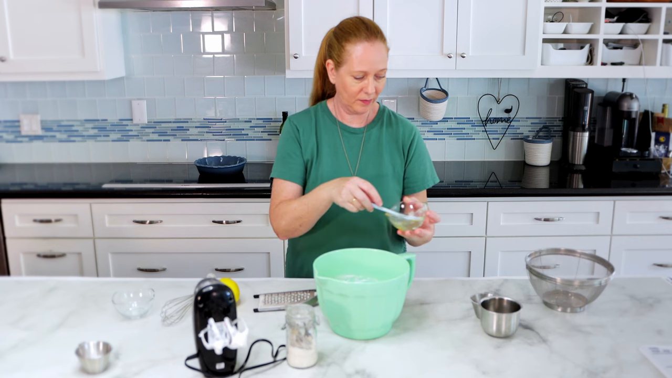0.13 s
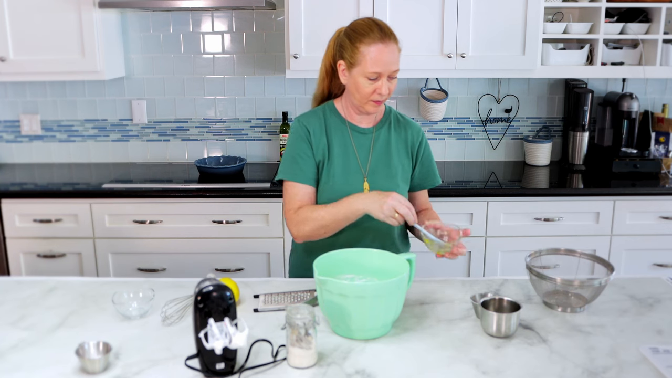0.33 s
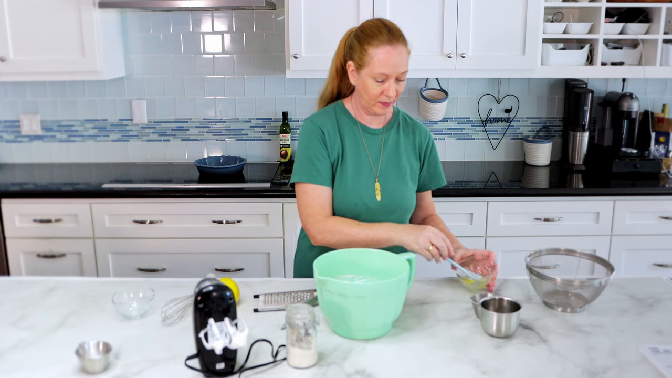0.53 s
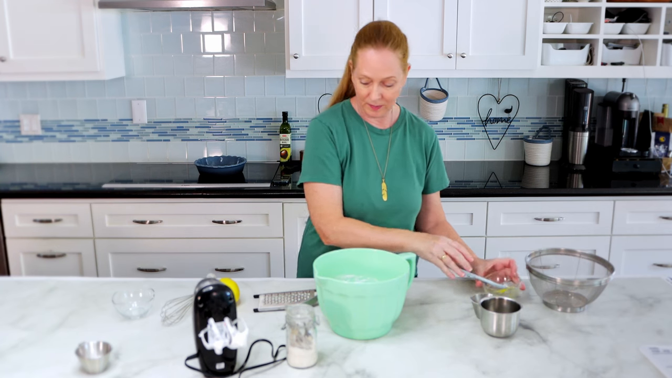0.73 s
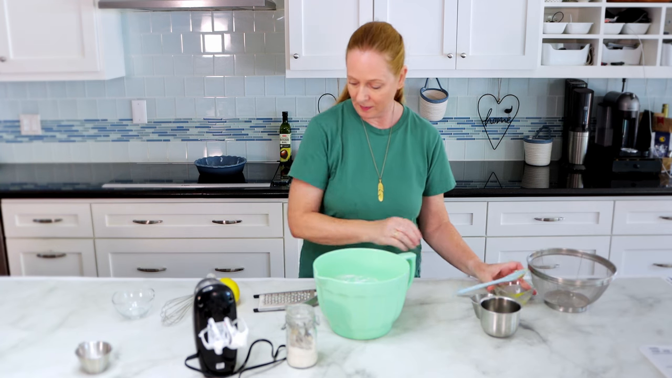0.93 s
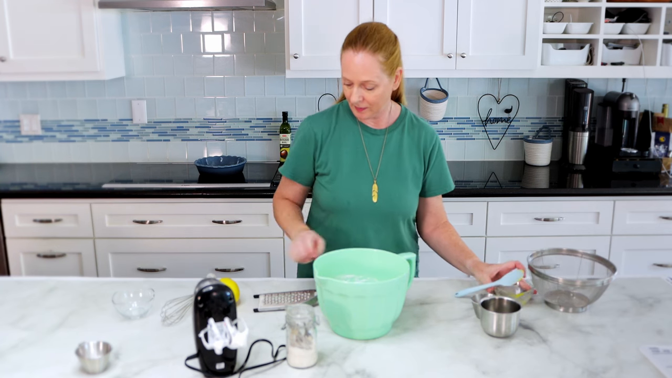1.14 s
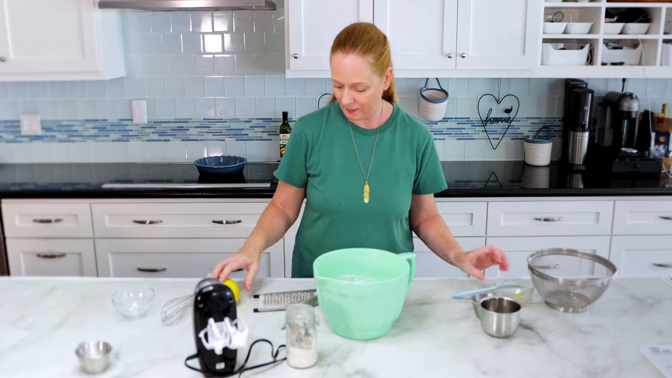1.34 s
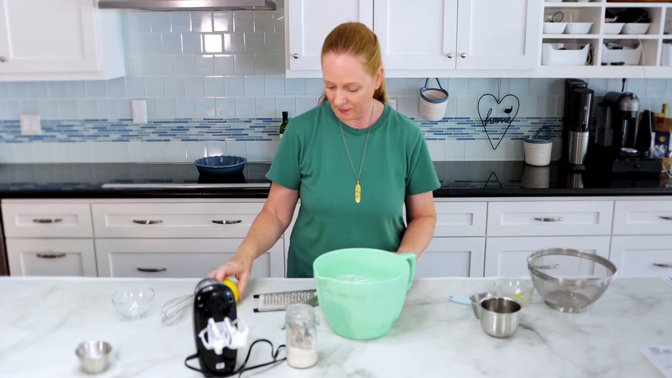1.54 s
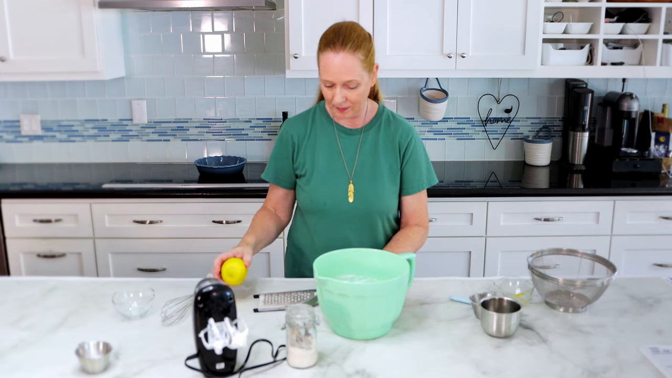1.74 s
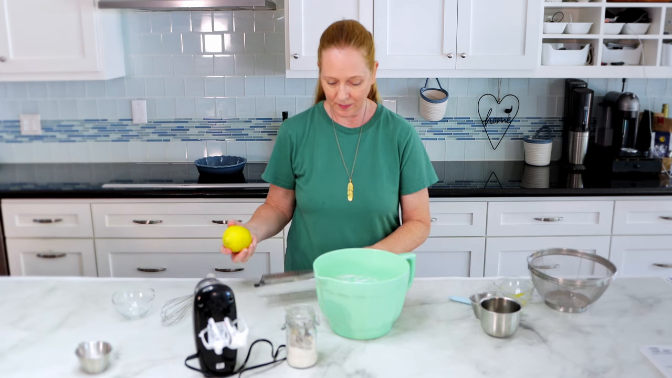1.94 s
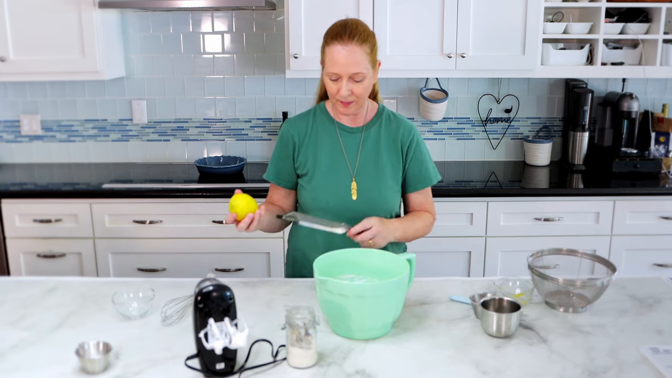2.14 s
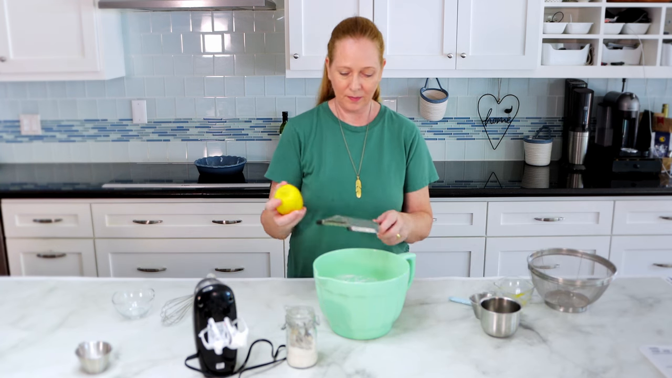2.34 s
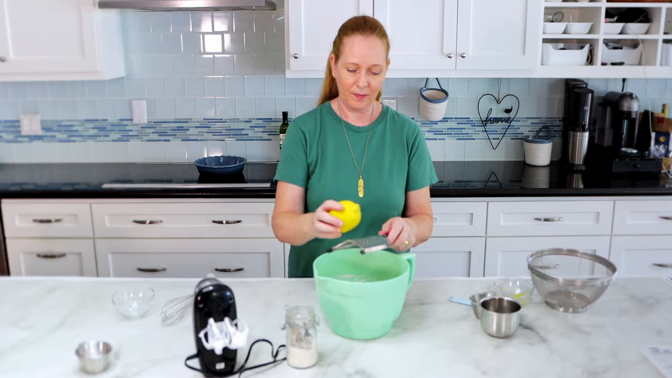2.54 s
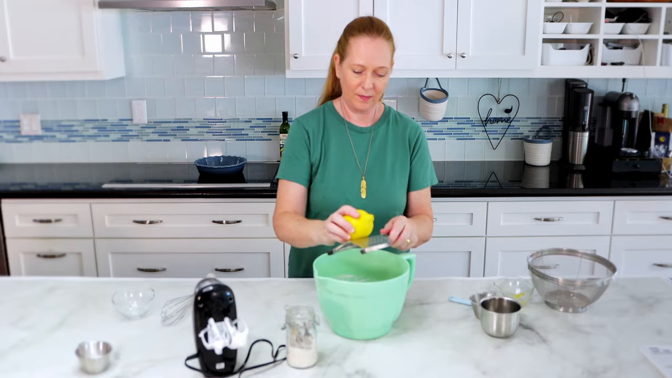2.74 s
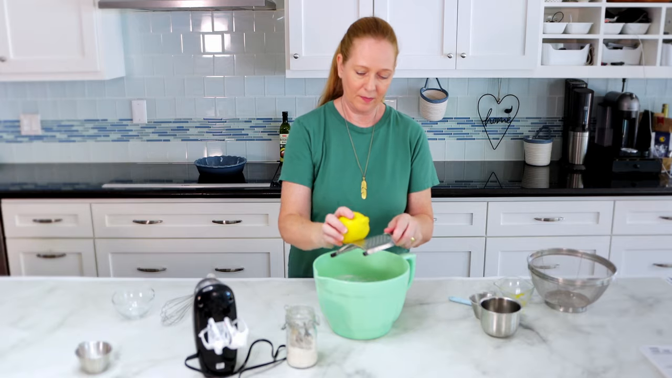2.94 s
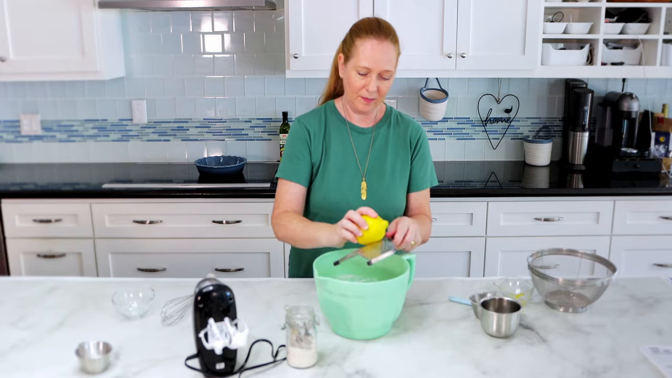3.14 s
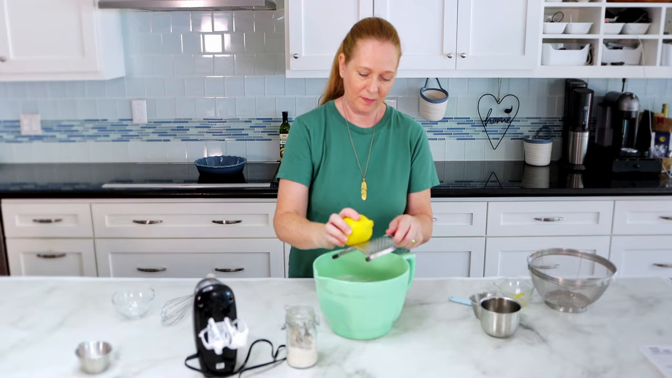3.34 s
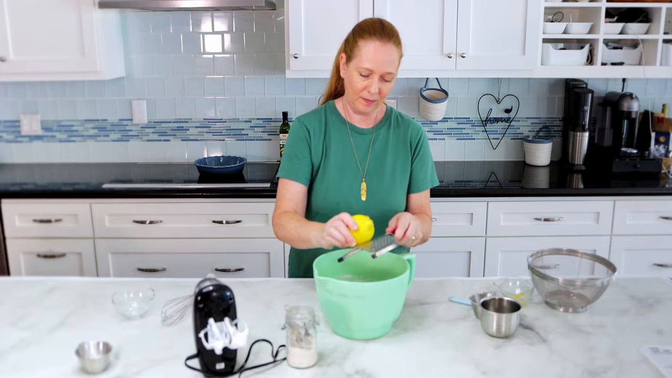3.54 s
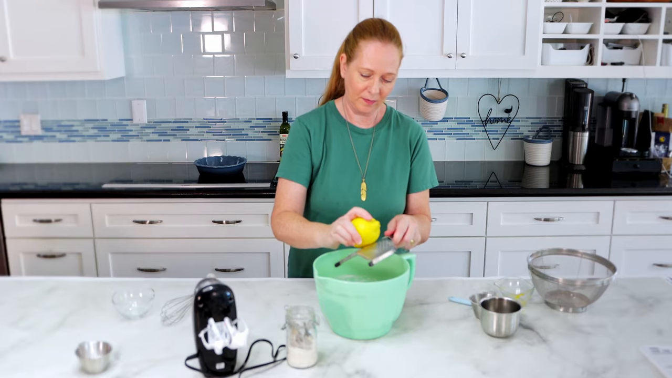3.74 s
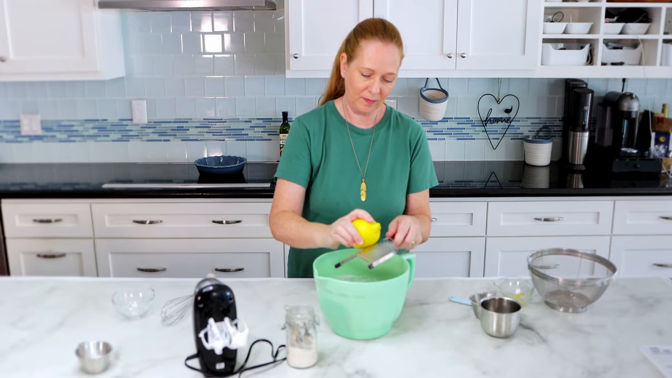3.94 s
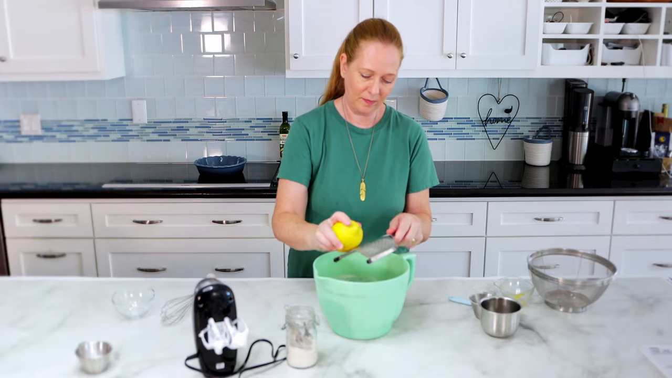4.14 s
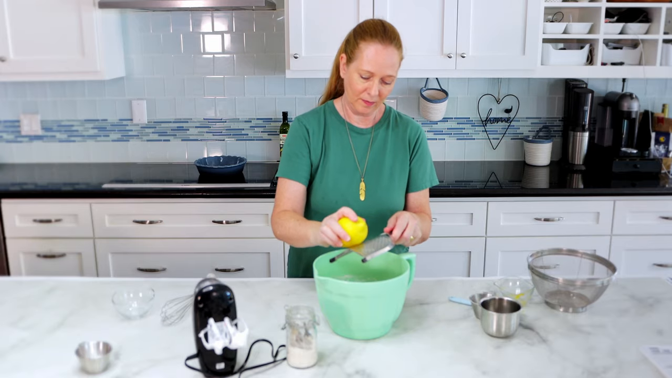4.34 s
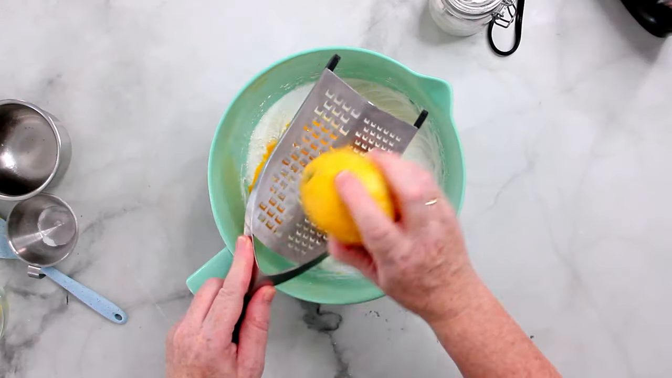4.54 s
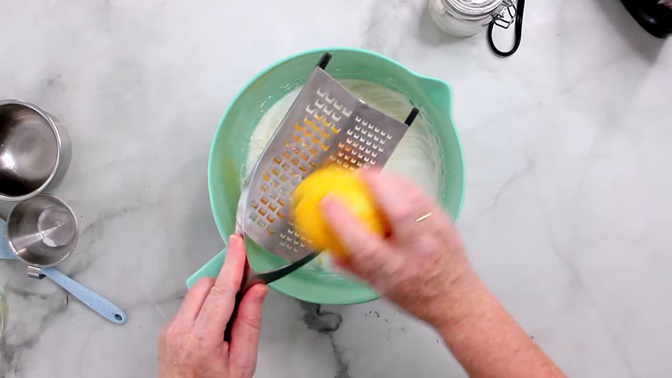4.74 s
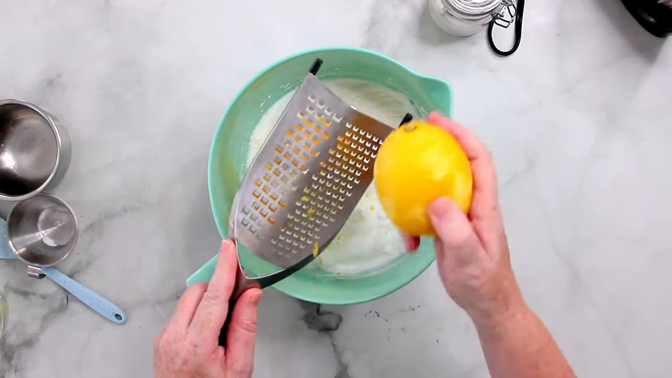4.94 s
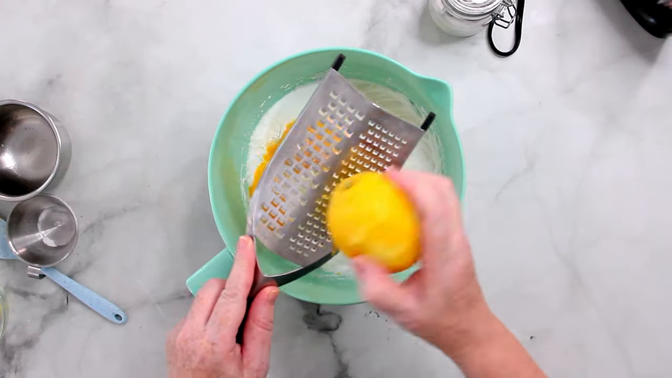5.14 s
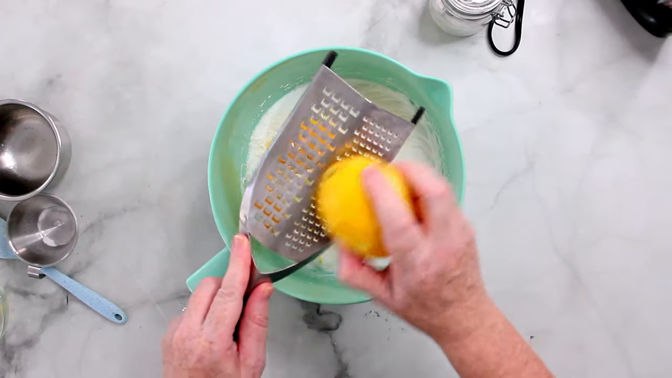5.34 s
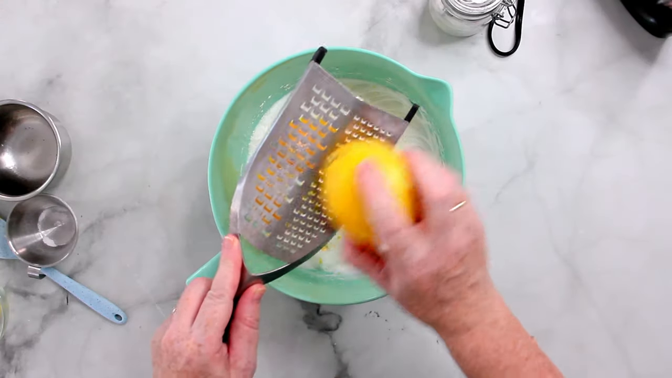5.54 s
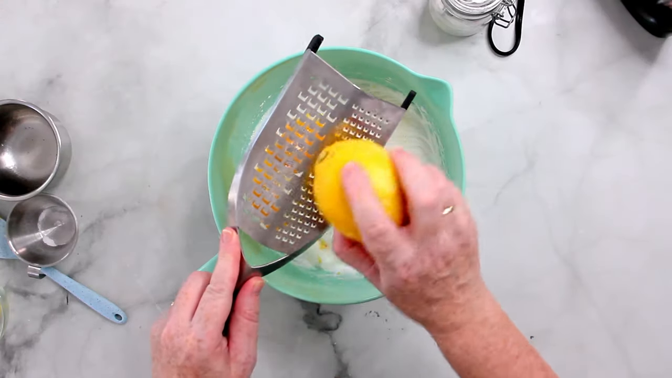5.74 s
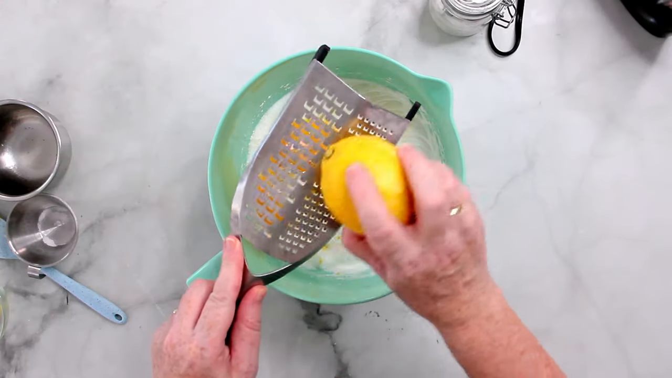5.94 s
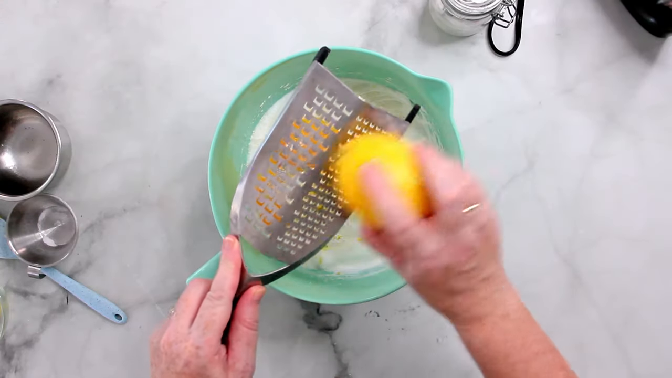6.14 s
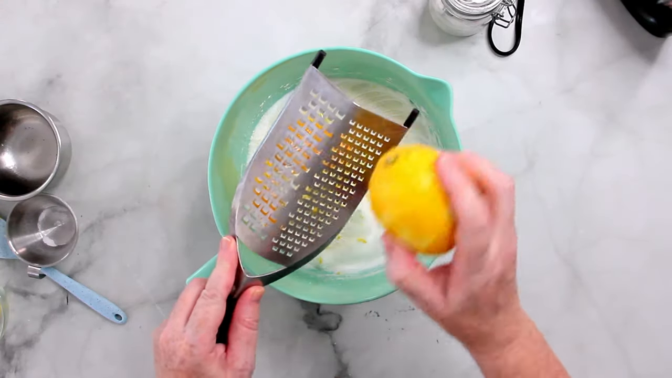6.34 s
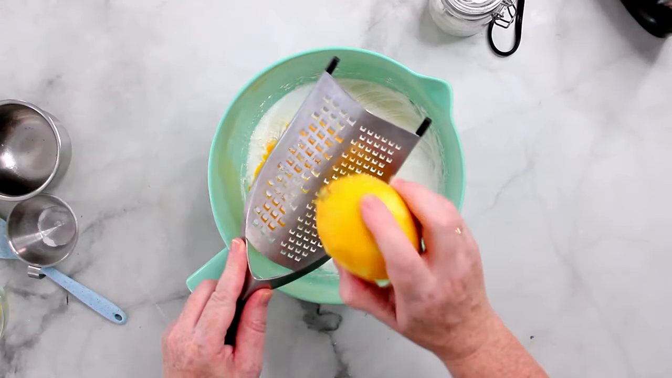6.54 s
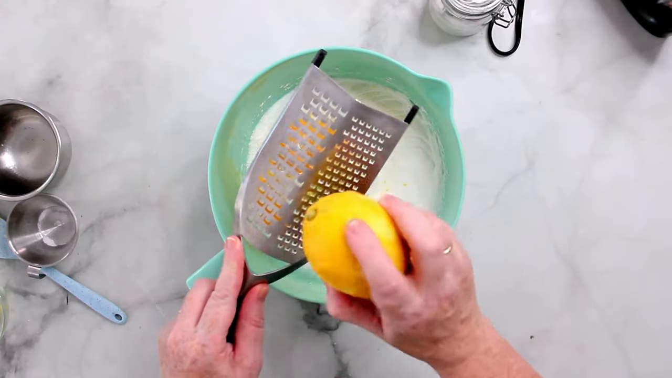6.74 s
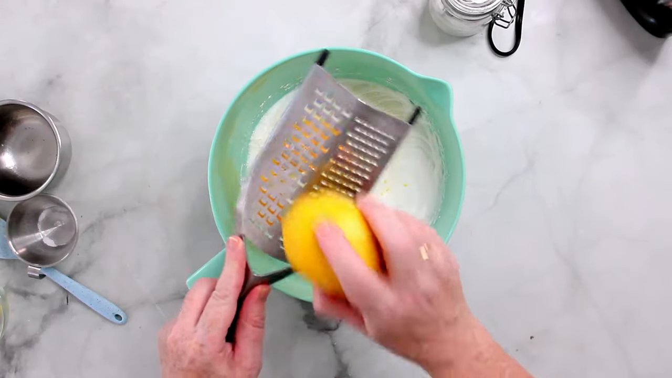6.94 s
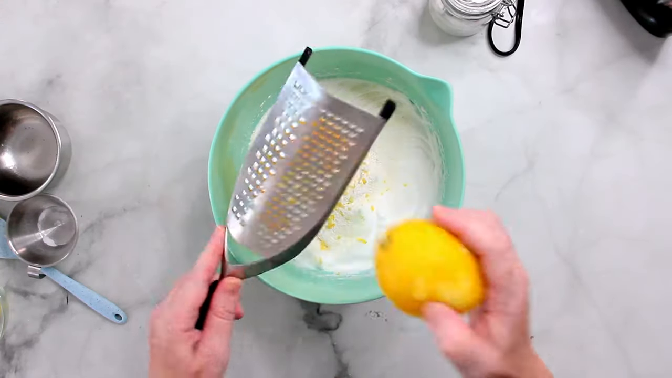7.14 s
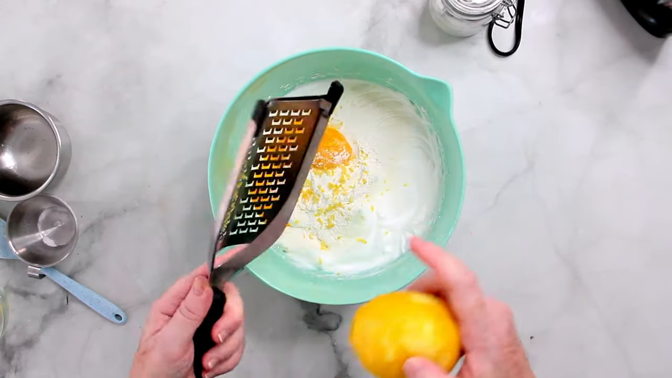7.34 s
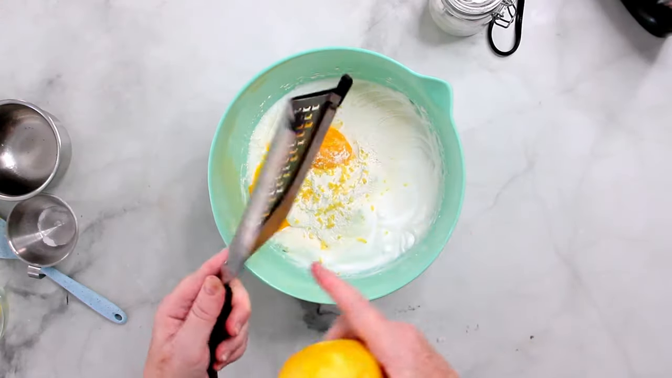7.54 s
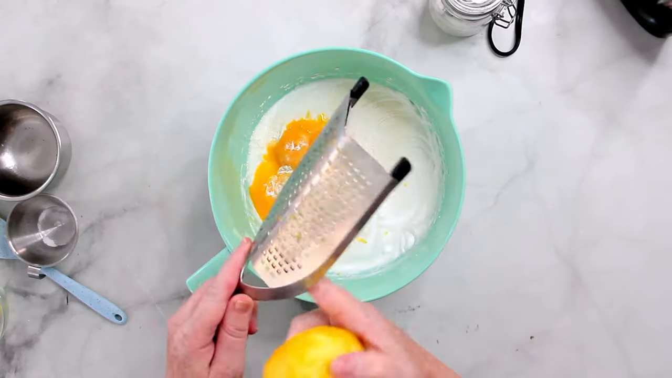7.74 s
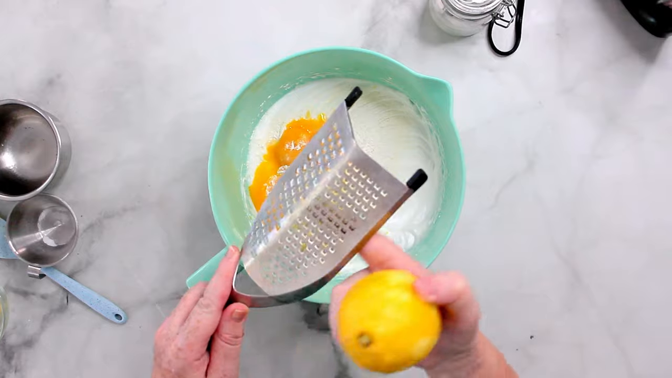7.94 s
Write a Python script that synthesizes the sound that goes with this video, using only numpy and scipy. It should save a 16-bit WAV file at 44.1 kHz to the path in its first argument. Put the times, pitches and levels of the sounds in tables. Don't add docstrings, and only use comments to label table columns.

```python
import sys
import numpy as np
from scipy import signal
from scipy.fft import rfft, irfft, next_fast_len
from scipy.io import wavfile
from scipy.ndimage import uniform_filter1d, map_coordinates

SR = 44100
rng = np.random.default_rng(int(sys.argv[2]) if len(sys.argv) > 2 else 0)


def convert_level_to_amplitude(level_db):
    exponent = np.asarray(level_db, float) / 20
    return 10 ** exponent


def master(y):
    cut = np.clip(np.atleast_2d(y).T, -1, 1)
    pcm = np.round(cut * 32767)
    wavfile.write(sys.argv[1], SR, pcm.astype(np.int16))


N = 352800
TIME = np.arange(N) / SR


def unit(x):
    return x / np.sqrt(np.mean(x ** 2) + 1e-20)


def along(points, hz):
    f, v = np.transpose(points)
    return np.interp(np.log(hz + 1), np.log(f + 1), v)


def curves(rows):
    s, *cols = np.transpose(rows)
    return [np.interp(TIME, s, c) for c in cols]


def wobble(rate):
    knots = rng.standard_normal(int(N * rate / SR) + 4)
    return map_coordinates(knots, [TIME * rate])


def filtered(x, response):
    m = next_fast_len(N + SR)
    return irfft(rfft(x, m) * response(np.fft.rfftfreq(m, 1 / SR)), m)[..., :N]


def modes(rows):
    def response(f):
        total = 0
        for k, (centre, width, db) in enumerate(rows):
            damping = 1j * f * width
            total = total + (-1) ** k * convert_level_to_amplitude(db) * damping / (centre * centre - f * f + damping)
        return total
    return response


def coloured(x, spectrum):
    cep = irfft(np.log(convert_level_to_amplitude(along(spectrum, np.fft.rfftfreq(4096, 1 / SR))) + 1e-6))
    cep[1:2048] *= 2
    cep[2049:] = 0
    pulse = irfft(np.exp(rfft(cep)))
    return signal.fftconvolve(x, pulse / np.linalg.norm(pulse))[:N]


# (frequency [Hz], correlation [0-1])
ALIKE = [(60, 1), (180, 0.984), (550, 0.85), (1650, 0.49), (4970, 0.2), (15000, 0.51)]


def rush(spectrum):
    def mid_side(hz):
        turn = np.arccos(np.clip(along(ALIKE, hz), -1, 1)) / 2
        return convert_level_to_amplitude(along(spectrum, hz)) * np.array([np.cos(turn), np.sin(turn)])
    mid, side = filtered(rng.standard_normal((2, N)), mid_side)
    return unit(np.array([mid + side, mid - side]))


def grit(spread_db, clump_rate, clump_db):
    size_db = spread_db * rng.exponential(size=N) + clump_db * wobble(clump_rate)
    return unit(rng.standard_normal(N) * convert_level_to_amplitude(size_db))


def blows(rows, life):
    click, rattle, t = np.zeros(N), np.zeros(N + SR), TIME[:SR // 4]
    for s, db in rows:
        start = round(s * SR)
        click[start] = convert_level_to_amplitude(db)
        rattle[start:][:len(t)] += convert_level_to_amplitude(db - 60 * t / life) * rng.standard_normal(len(t))
    return click, rattle[:N]


def flutter(x, depth_db):
    z = signal.stft(x, nperseg=512)[2]
    field = uniform_filter1d(rng.standard_normal(z.shape), size=2, axis=0)
    field = uniform_filter1d(field, size=5, axis=1)
    return signal.istft(z * convert_level_to_amplitude(depth_db * unit(field) - depth_db ** 2 / 9), nperseg=512)[1][:N]


# (frequency [Hz], t60 [s])
KITCHEN = [(200, 0.76), (1500, 0.6623), (4000, 0.5624), (12000, 0.3804)]
# (frequency [Hz], level [dB])
SPREAD = [(200, -22), (500, -11.5), (1500, -4.5), (4000, -3.5), (12000, -0.5)]


def placed(x, echoed, pan_db, wet_db, short):
    hz, t, z = signal.stft(rng.standard_normal((2, SR)), SR, nperseg=256)
    z[1] *= convert_level_to_amplitude(along(SPREAD, hz))[:, None]
    decay = convert_level_to_amplitude(-60 * t / (short * along(KITCHEN, hz)[:, None]))
    mid, side = signal.istft(z * decay, SR, nperseg=256)[1]
    tail = np.array([mid + side, mid - side]) / np.linalg.norm(mid)
    late = np.pad(echoed, (130, 0))
    wet = signal.fftconvolve(late[None], tail, axes=1)[:, :N]
    return (x + convert_level_to_amplitude(wet_db) * wet) * convert_level_to_amplitude([[pan_db / 2], [-pan_db / 2]])


def struck(rows, colour, life, click_db, rattle_db, pan_db, wet_db, short):
    click, rattle = (coloured(x, colour) for x in blows(rows, life))
    return placed(convert_level_to_amplitude(click_db) * click + convert_level_to_amplitude(rattle_db) * rattle, click, pan_db, wet_db, short)


# (frequency [Hz], density [dB per Hz])
RUMBLE = [(13, -73), (22, -52.5), (48, -8), (108, 4.5), (182, -1), (240, 2), (265, -6.5), (400, -14.5),
          (520, -46.5), (880, -120)]
AIR = [(150, -33.5), (250, -2), (375, -8.5), (537, -9.5), (633, -14.5), (908, -15.5), (1380, -21.5),
       (2590, -28.5), (4500, -37), (9000, -52.5), (11700, -81.5), (19800, -120)]
HISS = [(2940, -34), (5000, -10), (5610, -9), (7170, -11), (8770, -14.5), (9480, -15), (10100, -17.5),
        (13800, -15), (15800, -29.5)]
SELF_NOISE = [(2000, -40), (4500, -4), (12000, -0.5), (13300, 4.5), (14300, -3.5), (15800, -6.5)]
# (frequency [Hz], level [dB])
HUM = [(123.8, -66.5), (242.2, -59.5), (349.9, -71), (538.3, -68), (882.9, -70.5), (1034, -73)]
# (time [s], level [dB])
DUCK = [(2.6, -0.5), (3.3, 1), (4.45, 1), (4.62, -6.5), (4.75, -10), (5.031, -16), (5.72, -13.5),
        (6.08, -8), (6.35, -14), (6.93, -9), (7.22, -13), (8, -11.5)]


def room_tone():
    duck_db, = curves(DUCK)
    hum = 0
    for hz, db in HUM:
        level = convert_level_to_amplitude(db + 1.5 + 0.83 * wobble(12)) * convert_level_to_amplitude(hz / 700 * duck_db)
        hum = hum + level * np.sin(2 * np.pi * hz * TIME + 2.026 * wobble(6))
    rumble = rush(RUMBLE)
    deep = filtered(rumble, lambda hz: 1 / (1 + (hz / 96.5) ** 4))
    rumble = convert_level_to_amplitude(-1.0) * deep + convert_level_to_amplitude(0.37 * duck_db) * (rumble - deep)
    rumble = convert_level_to_amplitude(-54.5 + 1.5 * wobble(9.2)) * rumble
    creep_db = 2.04 * np.minimum(TIME, DUCK[2][0])
    hiss = convert_level_to_amplitude(-86 + creep_db + 1.6 * duck_db) * rush(HISS)
    air = rush(AIR)
    top = filtered(air, lambda hz: 1 / (1 + (2800 / (hz + 1)) ** 8))
    air = convert_level_to_amplitude(-55 + duck_db) * (air - top) + convert_level_to_amplitude(-55 + 1.6 * duck_db) * top
    return rumble + air + hiss + hum + convert_level_to_amplitude(-92.5) * rush(SELF_NOISE)


# (time [s], level [dB], frequency [Hz], t60 [s])
FEET = [
    (0.7673, -10.5, 1530, .025),
    (0.7716, -16, 1340, .03),
    (0.7695, -26, 520, .05),
    (0.774, -27, 440, 0.0727),
]


def feet():
    out = 0
    for s, db, hz, t60 in FEET:
        t = np.clip(TIME - s, 0, 1)
        onset = 1 - np.exp(-t / .0004)
        out = out + convert_level_to_amplitude(db - 60 * t / t60) * onset * np.sin(2 * np.pi * hz * t)
    return out * convert_level_to_amplitude([[-1.0], [1.0]])


# (time [s], peak level [dB])
KNOCK = [
    (0.7655, -13.5),
]
# (time [s], peak level [dB])
CLINKS = [
    (0.977, -37),
    (1.0442, -41.5),
]
# (time [s], level [dB], frequency [Hz], t60 [s])
TICK = [
    (1.108, -56.5, 3383, 0.064),
]
# (frequency [Hz], density [dB
# per Hz])
CUP = [(76, -50), (130, -24), (258, -20), (343, -18), (587, -6), (745, -7.5), (865, -8), (989, -6.5),
       (1200, -4), (1520, 1), (1720, -10), (2490, -15.5), (4600, -46.5), (5980, -78.5), (10100, -120)]
BRIGHT_TAIL = [(2710, -30.5), (4600, -1.5), (10000, -2.5), (12000, -1.5), (13900, -6.5), (15000, -19)]
SPOON = [(1900, -42), (2760, -10.5), (4700, -15), (5300, -3), (6470, -11.5), (8220, -1.5), (9040, -7.5),
         (9650, -10.5), (11400, 0.5), (13500, -12), (15000, -25), (15500, -44)]
NUDGE = [(900, -28), (1600, -4.5), (2500, 4), (3400, -5), (4500, -3), (7000, -25)]
# (frequency [Hz], width [Hz], level [dB])
HOLLOW = [(1206, 14, -5.5), (1222, 12, -5.5), (1363, 14, -2), (1438.6, 14, -2.5), (1505, 11, -3),
          (1522, 12, -5), (1570, 10, -1), (1596, 12, -5.5), (880, 12, -7), (656.4, 15, -9), (576, 16, -8),
          (487, 16, -5), (234, 24, -5)]


def set_down():
    cup = struck(KNOCK, CUP, life=0.0688, click_db=-22.5, rattle_db=-7.5, pan_db=-1.5, wet_db=21.0, short=0.884)
    bright_tail = struck(KNOCK, BRIGHT_TAIL, life=.02, click_db=-34.5, rattle_db=-45.0,
                    pan_db=-2.0, wet_db=-15.5, short=1.8)
    landing = np.roll(blows(KNOCK, .01)[0], round(0.0025 * SR))
    ring = convert_level_to_amplitude(36.0) * filtered(landing, lambda hz: modes(HOLLOW)(hz) / (1 + 1j * hz / 2500) ** 4)
    ring = placed(ring, ring, pan_db=0.5, wet_db=-3.0, short=0.611)
    spoon = struck(CLINKS, SPOON, life=0.0107, click_db=-1.5, rattle_db=-0.5, pan_db=-3.0, wet_db=19.5, short=0.68)
    s, db, hz, t60 = TICK[0]
    tick = (TIME > s) * convert_level_to_amplitude(db - 60 * np.abs(TIME - s) / t60) * np.sin(2 * np.pi * hz * TIME)
    nudge = struck([(s, db + 6.5)], NUDGE, life=0.033, click_db=-3, rattle_db=-6.0,
                   pan_db=-3.0, wet_db=17.5, short=.6)
    return cup + bright_tail + ring + spoon + tick + nudge + feet()


def note(hz, rows):
    sounding = (TIME > rows[0][0]) * (TIME < rows[-1][0])
    return sounding * np.sqrt(2) * convert_level_to_amplitude(curves(rows)[0]) * np.sin(2 * np.pi * hz * TIME)


# (time [s], pressure [dB])
DRAG = [
    (1.526, -56.5),
    (1.532, -31),
    (1.56, -40),
    (1.61, -32.5),
    (1.66, -41),
    (1.672, -29.5),
    (1.742, -34),
    (1.778, -45.5),
    (1.9, -65.5),
]
# (frequency [Hz], level [dB], beat rate [per s], beat depth [0-1], loudest beat [s])
SONG = [(2570, -52, 11, 0.3, 1.728), (3021, -52, 5, .8, 1.64), (3278, -53, 6, .8, 1.65)]


def song():
    t = TIME - DRAG[0][0]
    swell_s, hold_s = 0.073, 0.15
    shape_db = -7.5 * np.clip(1 - t / swell_s, 0, 1) - 53.5 * np.clip(t - swell_s - hold_s, 0, None)
    damped_db = 176.5 * np.clip(TIME - 1.901, 0, None)
    out = 0
    for hz, db, beat, depth, s in SONG:
        level = convert_level_to_amplitude(db + shape_db - damped_db * (753.4 / hz) ** 0.28)
        beating = 1 + depth * np.cos(2 * np.pi * beat * (TIME - s))
        out = out + level * beating * np.sin(2 * np.pi * hz * TIME)
    return (t > 0) * out


# (time [s], peak level [dB], treble [dB])
JOLTS = [
    (1.53, -24, -8.5),
    (1.564, -23, -7.5),
    (1.592, -19, -6),
    (1.605, -22.5, -6.5),
    (1.67, -26, 3),
    (1.746, -30.5, -4.5),
]
# (frequency [Hz], level [dB], t60 [s])
STEEL = [(1184, -18, 0.064), (2103, -18, 0.054), (604.6, -16.5, .06)]
# (frequency [Hz], width [Hz], level [dB])
FLAT_WALL = [(2984, 26, -2), (3310, 19, -0.5), (3649, 28, -3), (4077, 22, -2), (4590, 24, -15.5),
             (4700, 12, -9.5), (4916, 40, -12), (5230, 36, -12.5), (5812, 30, -16), (6150, 22, -21)]
TIPPED_WALL = [(3130, 16, -1), (3131, 31, 5.5), (3310, 37, 0), (3690, 31, -8), (4116, 28, 1),
               (4594, 33, -11.5), (4800, 45, -13), (5200, 33, -12), (5490, 38, -15), (5790, 35, -14.5),
               (6020, 55, -18)]
RIM = [(6370, 33, -20), (6670, 66, -20), (7120, 35, -16), (7458, 22, -6), (7680, 180, -6), (8280, 49, -6),
       (8780, 27, -14), (9120, 94, -20), (9555, 40, -4), (9800, 24, -14), (10010, 31, -7), (10400, 72, -7),
       (10800, 34, -15), (11300, 50, -5), (11400, 15, -12), (11598, 30, 1), (11760, 45, 2), (11902, 20, -6),
       (12155, 31, -7), (12500, 40, -14), (12900, 99, -16), (13600, 28, -19), (13900, 50, -12),
       (14400, 200, -20), (14700, 60, -16)]
# (frequency [Hz], level [dB])
CROWD = [(3000, -3), (4500, -0.5), (5500, 0.5), (6500, -6.5), (7200, -1), (11500, 0), (14500, -3.5)]
# (frequency [Hz], density [dB per Hz])
SCRAPE = [(120, -51.5), (200, -18), (497, -18.5), (755, -8), (1300, -12), (1740, -3.5), (3750, -9.5),
          (4580, -21), (11600, -13), (15500, -24)]
RASP = [(3500, -30), (4500, -2), (6000, 0), (9000, -2), (11000, 0), (14000, -4), (15000, -25)]
# (time [s], level [dB])
LOW_NOTE = [(1.526, -75), (1.54, -46.5), (1.636, -40.5), (1.688, -39.5), (1.852, -49), (1.914, -59.5),
            (1.96, -72.5), (2.1, -110)]
MIDDLE_NOTE = [(1.526, -82), (1.608, -45.5), (1.662, -50), (1.69, -61), (1.70, -52.5), (1.742, -70.5),
               (1.75, -54.5), (1.868, -56), (2.1, -100)]
HIGH_NOTE = [(1.526, -80.5), (1.56, -52), (1.57, -41.5), (1.606, -45), (1.614, -35.5), (1.676, -42),
             (1.683, -50.5), (1.696, -38.5), (1.71, -62), (1.75, -45), (1.78, -42), (1.942, -56.5),
             (2.1, -91)]


def steel():
    drive_db, = curves(DRAG)
    sliding = (TIME > DRAG[0][0]) * (TIME < DRAG[-1][0])
    bumps = blows([row[:2] for row in JOLTS], .01)[0]
    sharp = blows([(s, db + treble_db) for s, db, treble_db in JOLTS], .01)[0]
    grains = grit(1.5, 80, 2.5)
    tipped_s = 1.668
    scrape = sliding * convert_level_to_amplitude(drive_db + np.where(TIME < tipped_s, -1, -11)) * grains
    shaking = convert_level_to_amplitude(40.5) * bumps + convert_level_to_amplitude(14.5) * scrape

    def wall(rows, db):
        narrow = [(hz, 0.31 * min(width, 45), level) for hz, width, level in rows]
        return convert_level_to_amplitude(db) * filtered(shaking, modes(narrow))

    tipped = np.clip((TIME - tipped_s) / 0.044 + .5, 0, 1)
    low = filtered(shaking, modes([(hz, 1.3 / t60, db) for hz, db, t60 in STEEL]))
    body = low + (1 - tipped) * wall(FLAT_WALL, -6.5) + tipped * wall(TIPPED_WALL, -9)

    rim = modes([(hz, 1.08 * width, db) for hz, width, db in RIM])
    shine = filtered(convert_level_to_amplitude(31.5) * sharp + sliding * convert_level_to_amplitude(drive_db + 13.0) * grit(0.92, 40, 0.93), rim)
    weak = []
    for u, v in rng.random((50, 2)):
        hz = 3000 + 11500 * u
        weak.append((hz, 22, -12 * v + along(CROWD, hz)))
    shine = shine + filtered(sliding * convert_level_to_amplitude(drive_db + 7) * grains, modes(weak))
    shine = shine + coloured(sliding * convert_level_to_amplitude(drive_db - 16) * grains, RASP)

    body, shine = flutter(body, 2), flutter(shine, 2)
    stone = coloured(scrape + convert_level_to_amplitude(7.0) * bumps, SCRAPE)
    stone = filtered(stone, lambda hz: 1 / (1 + 1j * hz / 3000) ** 2)
    notes = note(760, LOW_NOTE) + note(1455, MIDDLE_NOTE) + note(1752, HIGH_NOTE)
    direct = body + shine + convert_level_to_amplitude(0.5) * stone + song() + notes
    return placed(direct, body + shine + stone, pan_db=-2.5, wet_db=-1.5, short=1.0)


# (time [s], peak level [dB], treble [dB], rattle t60 [s], bass [dB])
TAPS = [
    (6.503, -27.5, -6.5, 0.03, -4),
    (6.669, -36, -7.5, 0.15, 2),
    (6.836, -33.5, -8, 0.08, 4),
    (7.005, -29.5, -18, 0.027, -1),
]
# (frequency [Hz], density [dB per Hz])
TAPPED = [(150, -17), (250, -1), (435, -9.5), (627, -2), (902, -8.5), (2070, -2.5), (2930, -8), (4500, -12),
          (7880, -15.5), (12800, -19), (15000, -32), (15800, -44.5)]
# (frequency [Hz], width [Hz], level [dB])
THUMP = [(220.4, 43, 2), (515, 59, -3), (611, 25, -3.5)]
HELD = [(621.6, 27, 2), (1470, 32.4, 0), (1728, 42, 1), (2055, 67, -3), (2737, 49.7, 4), (3166, 35, 4),
        (3700, 27, 4), (4140, 27, 5), (5200, 33, 1)]
SHEET = [(4750, 82, -5), (5780, 60, -9), (6100, 60, -8), (6690, 40, -6), (8020, 60, -5), (9380, 60, -4),
         (12000, 80, -6), (4030, 150, -8)]


def taps():
    out, pushes = 0, np.zeros(N)
    for s, db, treble_db, life, bass_db in TAPS:
        colour = [(hz, level + (treble_db + 12.0) * hz / 9000 + bass_db * (hz < 1000)) for hz, level in TAPPED]
        peel = struck([(s - .0043, db - 7)], colour, 0.089, click_db=-4, rattle_db=-3.5,
                      pan_db=-1.5, wet_db=13.0, short=0.68)
        sheet = struck([(s + 0.0008, db)], colour, life, click_db=1.0, rattle_db=-5.0,
                       pan_db=-1.5, wet_db=18.0, short=0.547)
        out = out + peel + sheet
        pushes[round(s * SR)] += convert_level_to_amplitude(db + bass_db)
    thump = convert_level_to_amplitude(25.5) * filtered(pushes, modes(THUMP))
    return thump + out + 0.44 * filtered(out, modes(SHEET)) + 0.467 * filtered(out, modes(HELD))


# (start [s], rise [s], hold [s], teeth level [dB], plate re teeth [dB])
STROKES = [(2.738, 0.0041, 0.0024, -55.5, 0), (2.776, 0.0135, 0.0039, -58, 11.5),
           (2.799, 0.0296, 0.0035, -54, 10.5), (2.96, 0.0375, 0.0455, -44, 2),
           (3.256, 0.0443, 0.0528, -42, 2.38), (3.547, 0.0163, 0.003, -52, 8.5),
           (3.555, 0.0418, 0.0048, -47.5, 2.5), (3.794, 0.0402, 0.0027, -51, 9),
           (3.851, 0.0165, 0.0027, -43, 0.5), (3.897, 0.0195, 0.0035, -45, 3),
           (4.081, 0.0561, 0.036, -40, 4.5), (4.36, 0.02, 0.037, -43, 4), (4.5734, 0.004, 0.004, -44, -3.5),
           (4.576, 0.0086, 0.012, -42, 2.5), (4.758, 0.0321, 0.0215, -38, -1),
           (5.199, 0.0066, 0.0099, -74.5, 11), (5.216, 0.019, 0.012, -49, -1.5),
           (5.275, 0.023, 0.012, -47, -4.5), (5.459, 0.024, 0.028, -43.5, -3), (5.68, .01, .008, -58, 2),
           (5.697, 0.018, 0.012, -39.5, -5.5), (5.883, 0.0091, .008, -66, 5),
           (5.899, 0.022, 0.012, -39, -2), (6.109, 0.0326, 0.0295, -38.5, -4)]
# (middle [s], length [s], teeth level [dB])
RETURNS = [(3.183, 0.14, -55), (3.457, 0.1467, -53), (3.718, 0.116, -71), (4.03, 0.107, -56.5),
           (4.28, 0.163, -53), (4.514, 0.146, -56), (4.686, 0.152, -59.5), (5.4, 0.085, -68.5),
           (5.614, 0.1146, -59.5), (5.815, 0.119, -63.5), (6.03, 0.136, -56.5)]


def rubbing(rise_power, lift_db_per_s, plate_share, return_db):
    t = TIME[::20]
    power = np.zeros(len(t))
    for s, rise, hold, db, plate_db in STROKES:
        up = np.clip((t - s) / rise, 0, 1) ** rise_power
        lift_db = lift_db_per_s * np.clip(t - s - rise - hold, 0, 1)
        power += (up * convert_level_to_amplitude(db + plate_share * plate_db - lift_db)) ** 2
    for s, length, db in RETURNS:
        swell = np.cos(np.pi * np.clip((t - s) / length, -.5, .5))
        power += (convert_level_to_amplitude(db + return_db) * swell) ** 2
    return np.interp(TIME, t, np.sqrt(power))


# (frequency [Hz], density [dB per Hz])
TEETH = [(1470, -31.5), (2500, -8.5), (4350, -14.5), (4850, -9.5), (5440, -11), (5930, -8), (12300, -7.5),
         (14000, -9), (15800, -27.5)]
CREAK = [(6000, -31), (10000, -6), (12500, 0), (14500, -5), (15800, -16)]
BOWL_RIM = [(200, -27.5), (350, -15.5), (580, 1), (800, -6), (1250, 2), (1700, -21.5), (3500, -10.5),
            (6000, -35.5)]
# (frequency [Hz], width [Hz], level [dB])
PLATE = [(1113, 168, -5.5), (1357.7, 90, -3), (1544, 87.3, -1), (1793, 117, -1.5), (2030, 203.5, -1),
         (2389, 182, -4.5), (2670, 211, -2), (3038, 702, -6)]
BOWL = [(477.5, 30, 2.5), (671.3, 50, 3.5), (1000.5, 215, 1)]
# (time [s], peak level [dB])
BITES = [(2.7406, -38), (2.7896, -44.5), (2.9755, -39), (3.274, -34), (3.5615, -43.5), (3.834, -34),
         (3.864, -32), (3.911, -33), (4.106, -31), (4.375, -34.5), (4.7803, -30), (5.2023, -56),
         (5.2262, -45.5), (5.473, -38), (5.709, -35.5), (5.918, -36), (6.1245, -44.5)]
SNAGS = [(2.8391, -33), (2.8566, -56), (2.975, -33), (2.9883, -41.5), (3.0004, -35.5), (3.0153, -29),
         (3.0663, -31.5), (3.1487, -45), (3.28, -44), (3.3042, -29.5), (3.3214, -32), (3.3745, -40),
         (3.4573, -43.5), (3.5623, -36), (3.5845, -40.5), (3.6004, -41.5), (3.8362, -37.5), (3.8541, -38),
         (3.8666, -41), (3.8818, -35.5), (3.9208, -37), (3.9296, -34.5), (4.1065, -41.5), (4.1239, -36.5),
         (4.1432, -27.5), (4.1843, -38), (4.2149, -46), (4.2287, -40.5), (4.3754, -38), (4.4273, -38),
         (4.4378, -41.5), (4.611, -45), (4.6226, -42), (4.6328, -41.5), (4.782, -37.5), (4.8001, -32),
         (4.8074, -35), (4.838, -44), (4.8466, -43), (5.2382, -46), (5.2447, -44), (5.2871, -48.5),
         (5.3006, -40.5), (5.341, -46.5), (5.4802, -44), (5.4895, -36.5), (5.523, -36.5), (5.7412, -33.5),
         (5.9099, -42), (5.9319, -38), (5.943, -37), (5.982, -41), (6.1251, -44)]
# (time [s], peak level [dB])
CREAKS = [
    (2.1892, -66.5),
    (2.2894, -78.5),
    (2.3694, -69.5),
    (2.5386, -69),
    (2.6294, -77),
    (2.6994, -68.5),
]
# (time [s], peak level [dB])
ROCKS = [
    (4.199, -33),
    (4.264, -32),
    (4.329, -40.5),
    (4.47, -44),
    (4.54, -42.5),
    (7.208, -67),
    (7.4, -69),
    (7.592, -71.5),
]
# (time [s], level [dB])
RUSTLE = [
    (7.7, -105),
    (7.85, -86),
    (8, -92),
]


def grater():
    cut = rubbing(rise_power=1.6, lift_db_per_s=269, plate_share=0, return_db=0)
    shake = rubbing(rise_power=1.26, lift_db_per_s=269, plate_share=0.753, return_db=-1)
    shake = np.roll(shake, -round(0.0011 * SR))
    tears = grit(1.9, 150, 0.93)
    hiss = coloured(tears, TEETH)
    teeth = unit(hiss + 1.54 * flutter(filtered(hiss, modes(SHEET)), 5))

    plate_modes, broad = modes(PLATE), modes([(2049, 1700, 0.00063)])

    def shaken(x):
        return filtered(x, lambda hz: plate_modes(hz) * broad(hz))

    rows = tears * convert_level_to_amplitude(2.2 * wobble(420) + 0.6 * wobble(60))
    plate = unit(shaken(rows))
    bowl = filtered(grit(1.04, 40, 3.15), modes(BOWL))
    bowl = unit(filtered(bowl, modes([(597, 1200, 0)])))
    rub = convert_level_to_amplitude(-2.5 + 1.1 * wobble(45)) * cut * teeth + convert_level_to_amplitude(-2.5) * shake * plate
    bowl_db = -34.5 + 0.135 * curves(DUCK)[0]
    rub = rub + convert_level_to_amplitude(bowl_db) * shake ** 0.576 * bowl
    rub = rub + convert_level_to_amplitude(curves(RUSTLE)[0]) * filtered(hiss, modes([(12160, 5000, 0.01)]))

    bite = blows(BITES, 0.039)[1]
    rub = rub + convert_level_to_amplitude(6.5) * shaken(bite) + convert_level_to_amplitude(-15.5) * coloured(bite, TEETH)
    pluck, snag = blows(SNAGS, .008)
    rub = rub + convert_level_to_amplitude(26) * shaken(pluck + 0.063 * snag) + convert_level_to_amplitude(-13.5) * coloured(snag, TEETH)
    rub = rub + convert_level_to_amplitude(-6.5) * coloured(blows(CREAKS, .03)[1], CREAK)
    rocks = struck(ROCKS, BOWL_RIM, life=0.022, click_db=-2, rattle_db=-6.5, pan_db=0.0, wet_db=16.5, short=0.45)
    near = placed(rub, rub, pan_db=-2.0, wet_db=-6.0, short=0.528)
    return near + placed(0, rub, pan_db=-2.0, wet_db=-18.5, short=0.58) + rocks


def scene():
    return room_tone() + set_down() + steel() + taps() + grater()


def band_limit(x):
    return signal.sosfilt(signal.butter(12, 15790, fs=SR, output="sos"), x)


def record(dry):
    notch = modes([(9950, 120, -1.1)])
    mix = filtered(dry, lambda hz: (1 - notch(hz)) * (hz < 15790))
    return band_limit(mix)


dry = scene()
out = record(dry)
master(out)
```